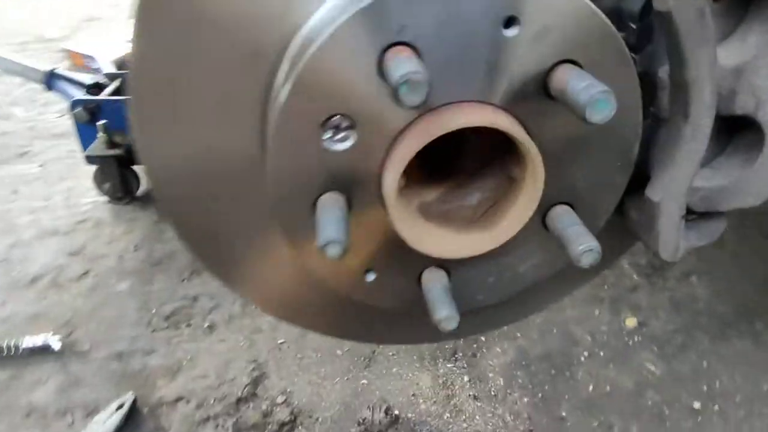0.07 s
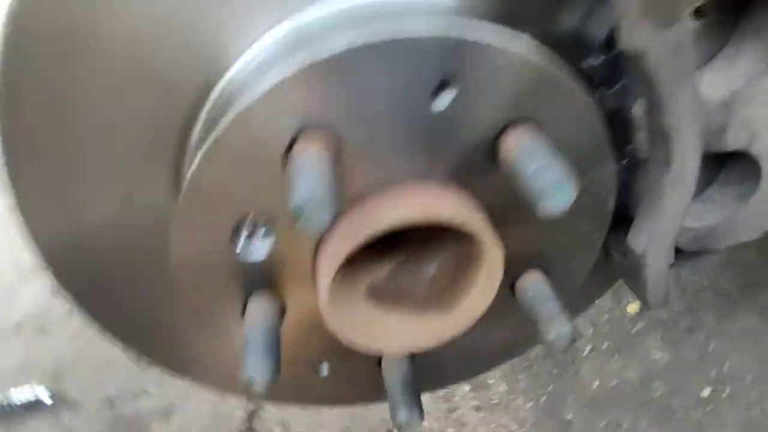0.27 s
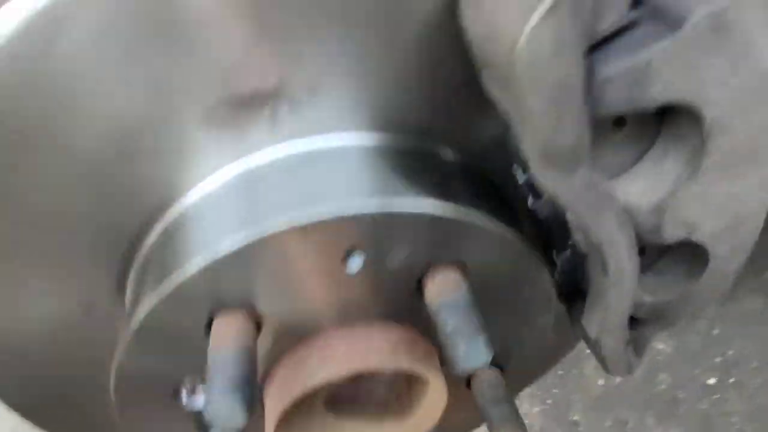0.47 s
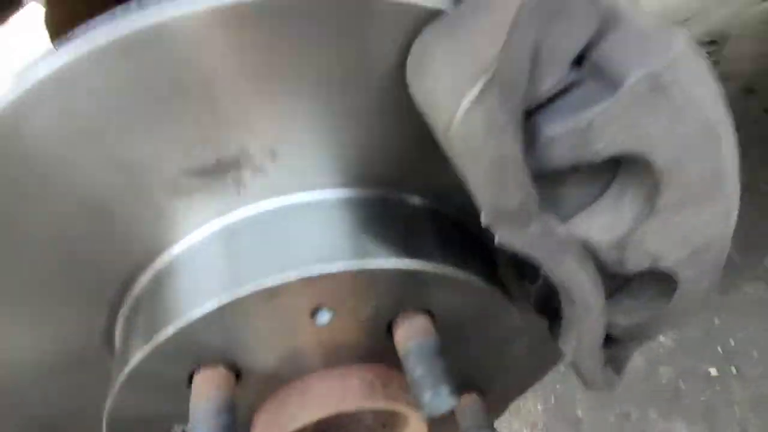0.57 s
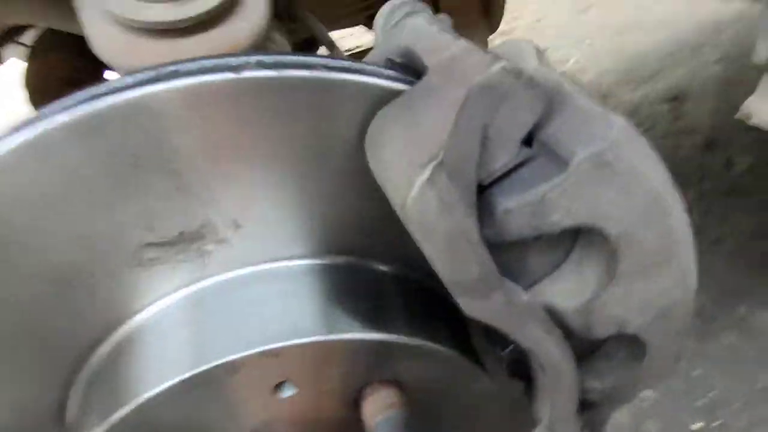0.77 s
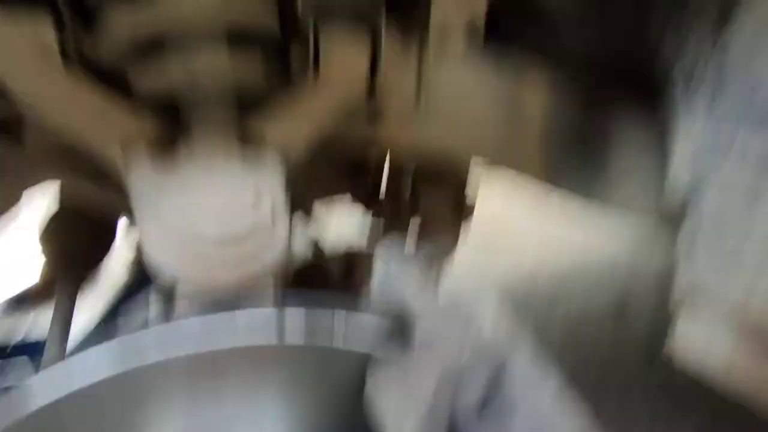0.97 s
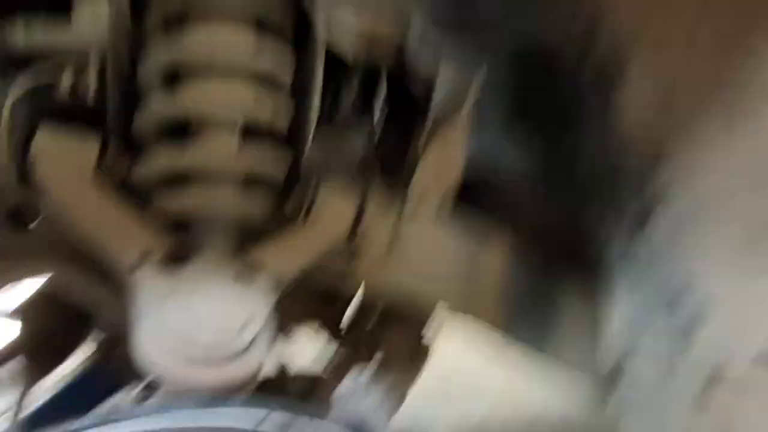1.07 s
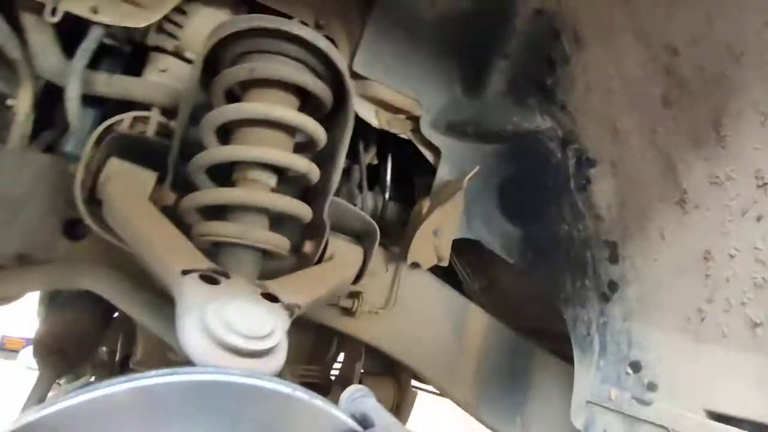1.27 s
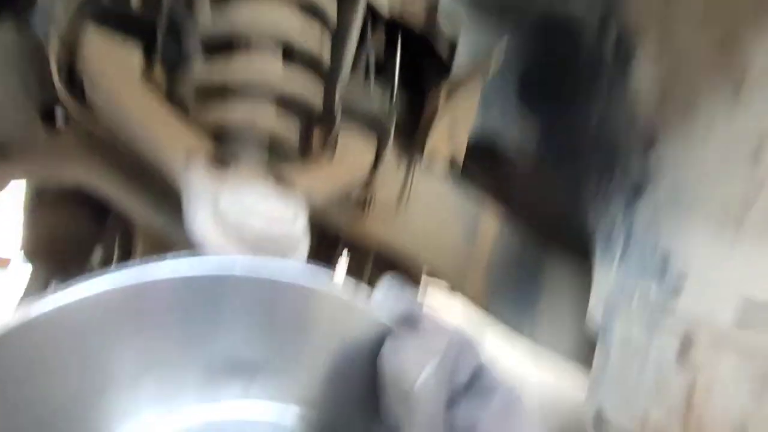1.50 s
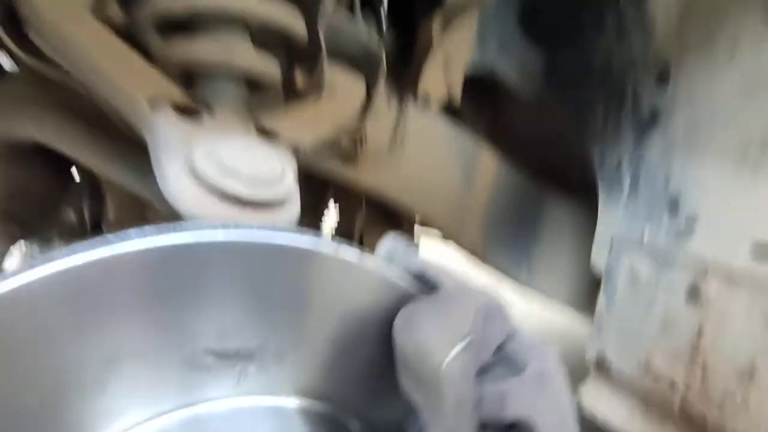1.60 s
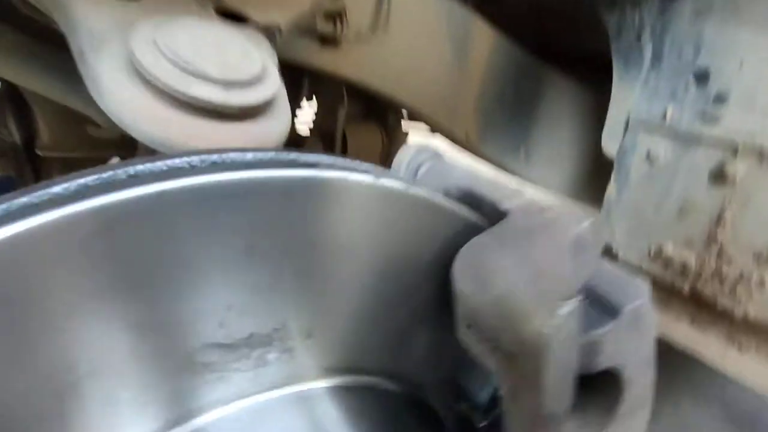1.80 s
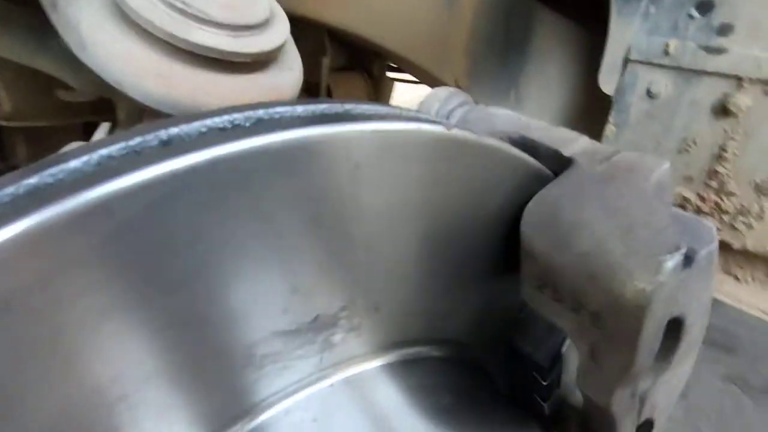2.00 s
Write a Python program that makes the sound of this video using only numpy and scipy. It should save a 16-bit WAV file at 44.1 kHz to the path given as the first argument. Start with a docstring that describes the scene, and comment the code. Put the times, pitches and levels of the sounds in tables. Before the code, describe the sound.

A sharp metallic clank sounds at about 0.2 seconds, just after a light scrape, as a loose steel part strikes a brake disc. A dull knock follows at 0.3 seconds, and the ring fades by about 0.6 with a slight workshop echo. Soft rubbing and moving air continue on the close microphone over a very faint hum, dipping around 1.4 seconds and returning with a faint scrape near 1.8.

```python
"""Soft rubbing, then a sharp clank: a loose steel part at a car's wheel hub shifts, strikes the brake disc
and drops back with a dull knock. Each impact excites damped modes of the hub and longer ones of the disc,
which rings briefly in an open-sided workshop. Rubbing and moving air swell and ebb as a hand-held phone
is swung up over the suspension; a faint hum lies underneath."""
import sys
import numpy as np
from scipy import signal
from scipy.fft import rfft, irfft
from scipy.io import wavfile
from scipy.ndimage import uniform_filter1d

SR = 44100
rng = np.random.default_rng(int(sys.argv[2]) if len(sys.argv) > 2 else 0)


def to_wav(sig):
    """Store sig (one row per channel, or 1-D mono) as 16-bit WAV at the path in sys.argv[1].

    Samples outside -1..1 are clipped; the rate is SR.
    """
    pcm = np.clip(np.atleast_2d(sig), -1, 1) * 32767
    pcm = np.round(pcm).astype(np.int16)
    wavfile.write(sys.argv[1], SR, pcm.T)  # frames by channels


N = 90404

# impacts of the loose part (time [s], thud gain [dB], ring gain [dB], crack gain [dB],
# contact cut-off [Hz], extra gain of the hub's bass modes [dB])
IMPACTS = [(0.17, -17.5, -24, -28, 2500, -2), (0.2068, -20.5, -31, -16, 1510, -20),
           (0.2282, 0, 2, -12, 7150, -4.5), (0.2334, -7, -23, -1.5, 3000, 9.5),
           (0.3189, 2, -46, -16.5, 833, 6.5), (0.324, -14.5, -46, -28, 687, 3.5)]
# modes of the brake disc (frequency [Hz], level [dB], free t60 [s], rise [s], L-R [dB], right lag [rad])
DISC_MODES = [(1258.4, -15.5, 0.31, 0.087, 3.5, 1.24), (2449, -31.5, 0.21, 0.00056, 8, 0.87),
              (2593, -47, 0.42, 0.00059, 6, 3.4), (2774, -50, 0.45, 0.0008, -3, 0.5),
              (3742, -45.5, 0.78, .003, 8.5, 0.3), (5165, -56, 0.23, .001, -11, 1),
              (6628, -45.5, 0.21, 0.00078, -1, 0)]
CONTACT_S = 0.00086  # rise time of a struck mode of the hub or the loose part


def hub_thuds():
    """Modal superposition: each impact excites the heavily damped modes of hub and suspension."""
    # hub modes (frequency [Hz], level [dB], t60 [s], L-R [dB], right lag [rad])
    hub_modes = [(354.7, -31, 0.042, 4, .05), (416.6, -27.5, 0.036, 2.5, 0.2), (545, -18.5, 0.029, -1, 0.4),
                 (630, -19.5, 0.034, -0.5, 0.69), (710, -25.5, 0.017, 19, 0.49),
                 (800.6, -30, 0.081, -1, 1.63), (1363, -29.5, 0.037, -10, 0.29),
                 (1418, -29, 0.029, 19.5, 0.65), (1674, -38.5, .05, -14, 0)]
    out, bass_hz = 0, 480
    for start, thud_db, _, _, contact_hz, bass_db in IMPACTS:
        for hz, db, t60, pan_db, lag in hub_modes:
            gain = undb(thud_db + db + bass_db * (hz < bass_hz)) * contact_lowpass(hz, contact_hz)
            out += gain * mode(clock() - start, hz, t60, CONTACT_S, pan_db, lag)
    return out


def disc_ring():
    """Free vibration of the struck disc, with added damping once the part has dropped back."""
    out, settled_s = 0, 0.34
    damping = fade(np.maximum(clock() - settled_s, 0), t60=0.7)
    for start, _, ring_db, _, contact_hz, _ in IMPACTS:
        for hz, db, t60, rise, pan_db, lag in DISC_MODES:
            gain = undb(ring_db + db) * contact_lowpass(hz, contact_hz)
            out += gain * mode(clock() - start, hz, t60, rise, pan_db, lag)
    return damping * out


def contact_cracks():
    """A brief contact has a broad spectrum: each impact radiates a fast-decaying burst of noise."""
    # crack spectrum (frequency [Hz], relative density [dB])
    spectrum = [(250, -48), (600, 2), (1050, 6), (1400, -11.5), (2500, -5.5), (3300, -13.5), (4000, -8.5),
                (4700, -18.5), (7000, -14), (10500, -25.5), (15000, -17)]
    envelope = sum(undb(db) * fade(clock() - start, t60=0.038) for start, _, _, db, _, _ in IMPACTS)
    return undb(-28) * pan(5) * envelope * noise(spectrum)


def loose_part():
    """The loose part rings at its own natural frequencies as it touches and settles."""
    # rings (time [s], frequency [Hz], level [dB], t60 [s], L-R [dB])
    rings = [(.171, 549, -39, 0.24, -2), (.319, 1994, -51, 0.43, 3)]
    return sum(undb(db) * mode(clock() - start, hz, t60, CONTACT_S, pan_db)
               for start, hz, db, t60, pan_db in rings)


def workshop(direct):
    """Reverberation by convolution: quick reflections in the wheel arch, a longer echo under the roof."""
    # echo spectrum (frequency [Hz], relative density [dB])
    spectrum = [(270, -8), (400, -8.5), (700, -6.5), (1050, -16), (1300, -7), (2500, -11.5), (6000, -5),
                (15000, -4.5)]
    out, delay_s = direct, 0.003
    for db, t60 in ((-13, 0.12), (-9, 0.4)):  # arch, roof
        response = noise(spectrum, coherence=0.86) * fade(clock() - delay_s, t60)
        response /= np.sqrt(np.mean(np.sum(response ** 2, axis=1)))  # unit energy
        out = out + undb(db) * signal.fftconvolve(direct, response, axes=1)[:, :N]
    return out


def rubbing():
    """Friction and moving air make three bands of noise, quietest and dullest while the phone rests."""
    # strength of the rubbing (time [s], low [dB], middle [dB], treble [dB])
    efforts = [(0, -62, -66.5, -74.5), (0.121, -70.5, -68.5, -76), (.22, -57, -57, -66),
               (.42, -49.5, -56.5, -65.5), (.54, -54.5, -61, -65.5), (0.662, -54.5, -57, -64.5),
               (0.821, -61, -64, -74.5), (0.928, -60.5, -68.5, -74.5), (1.1, -63.5, -70.5, -76.5),
               (1.3, -69.5, -74, -80.5), (1.459, -73, -76.5, -84.5), (1.63, -59.5, -70, -75),
               (1.76, -58.5, -62.5, -72.5), (1.9, -57, -60, -67), (2.05, -52.5, -60, -65)]
    # spectra of the three bands (frequency [Hz], relative density [dB])
    low = [(180, -13), (210, 10), (250, -4.5), (295, -4), (350, 1.5), (430, 0.5), (520, -4.5), (700, -6),
           (830, -15), (1000, -6)]
    middle = [(470, -77.5), (800, 5.5), (1030, 3), (1270, 1), (1900, 0), (2200, 1.5), (3230, -5.5),
              (3880, -6), (5000, -19.5), (6500, -69), (11000, -120)]
    treble = [(4300, -29.5), (4800, -16), (5900, -7), (6850, 2), (7900, -5.5), (10000, -15.5), (13000, -15),
              (15000, -10.5), (15800, -8)]
    # each band at the microphone ports (gain [dB], L-R [dB], coherence [0-1], right lag [s])
    bands = [(-1.5, 1, 0.68, 0.00009), (1, 6, 0.1, .0002), (2, 6.5, 0.2, 0.000387)]
    flicker_db, grain_db, brightening = 0.12, 0.86, 0.083
    times, *curves = np.array(efforts).T
    out = 0
    for spectrum, curve, (db, pan_db, coherence, lag) in zip((low, middle, treble), curves, bands):
        band = noise(spectrum, coherence, lag)
        effort_db = np.interp(clock(), times, curve)
        level_db = effort_db + db + flicker_db * wander(hz=26.06)
        if spectrum is not low:
            level_db += grain_db * wander(hz=412)
        if spectrum is treble:  # harder rubbing is brighter
            top = irfft(rfft(band) * top_octave(np.fft.rfftfreq(N, 1 / SR)), N)
            band += top * (undb(brightening * (effort_db - curve.mean())) - 1)
        out += undb(level_db) * pan(pan_db) * band
    return out


def scuffs():
    """Friction hiss: the loose part scrapes just before the clank, then come faint handling brushes."""
    # short swells of hiss (time [s], duration [s], level [dB], L-R [dB])
    swells = [(0.176, 0.028, -48, 5), (0.583, 0.039, -60, -2), (0.851, 0.036, -61.5, 3.5),
              (1.896, 0.012, -59.5, 2)]
    # hiss spectrum (frequency [Hz], relative density [dB])
    spectrum = [(400, -20), (1500, -6.5), (3500, -4.5), (5000, -13.5), (7200, -4), (10000, -17.5),
                (15000, -16)]
    hiss = noise(spectrum)
    return sum(undb(db) * pan(pan_db) * swell(start, length) * hiss
               for start, length, db, pan_db in swells)


def scrapes():
    """Light scrapes and squeaks: friction drives one resonance each, the narrower the more tonal."""
    # strokes (time [s], duration [s], level [dB], centre frequency [Hz], bandwidth [Hz])
    strokes = [(.18, .04, -47, 830, 250), (1.256, .02, -69, 7150, 1400), (1.322, .035, -75, 7150, 1400),
               (1.585, .19, -69, 3660, 130), (1.798, .045, -60, 3950, 550), (1.795, .05, -59, 2250, 900),
               (1.796, .022, -68, 6200, 600), (1.796, .022, -69, 8900, 400), (.63, .15, -74, 5480, 50)]
    out = 0
    for start, length, db, hz, width in strokes:
        band = shaped_noise(lambda f: resonance(f, hz, width), coherence=0.38)
        out += undb(db) * swell(start, length) * band
    return pan(7.6) * out


def disc_drag():
    """Forced vibration: friction keeps the disc's modes singing faintly until the clank."""
    def gain(f):
        # the struck levels, tilted towards the treble, with their contrast in dB halved
        return sum(undb((db + 3.5 * np.log2(hz / DISC_MODES[0][0])) / 2) * resonance(f, hz, width_hz=22)
                   for hz, db, *_ in DISC_MODES)
    envelope = np.interp(clock(), [0, 0.18, 0.24], [0.5, 1.5, 0])
    return undb(-68.5) * pan(5) * envelope * shaped_noise(gain, coherence=0.9)


def hum():
    """A harmonic series, as of a distant engine: orders 8 to 15 of a slow firing rate, each wavering."""
    # course of the hum (time [s], firing rate [Hz], level [dB])
    course = [(0, 37.7, -73), (0.651, 37.57, -64.5), (1.0, 37.38, -69), (1.3, 37.73, -72.5),
              (1.56, 38.09, -70.5), (1.8, 38.4, -62), (2.05, 37.87, -64)]
    times, rate, db = np.array(course).T
    phase = 2 * np.pi * np.cumsum(np.interp(clock(), times, rate)) / SR
    out, tilt_db_per_octave, waver_db = 0, -8.5, 3.5
    for order in range(8, 16):
        gain = undb(tilt_db_per_octave * np.log2(order) + waver_db * wander(hz=5.865))
        out += gain * np.sin(order * phase + rng.uniform(0, 2 * np.pi))
    return undb(np.interp(clock(), times, db)) * pan(2.5) * out / out.std()


def mode(t, hz, t60, rise, pan_db, lag=0):
    """A damped oscillator that builds up and dies away, with its own level and phase at each port."""
    envelope = fade(t, t60) * (1 - np.exp(-np.maximum(t, 0) / rise))
    return pan(pan_db) * envelope * np.sin(2 * np.pi * hz * t - np.array([[0], [lag]]))


def contact_lowpass(hz, cutoff_hz):
    """A softer contact lasts longer and so excites high modes less."""
    return 1 / np.sqrt(1 + (hz / cutoff_hz) ** 4)


def resonance(hz, centre_hz, width_hz):
    """Lorentzian peak; the width is taken at half height."""
    return 1 / (1 + ((hz - centre_hz) / (width_hz / 2)) ** 2)


def shaped_noise(gain, coherence=0, lag=0):
    """Filtered stereo noise of rms 1; the ports share a coherent part, the right one later."""
    hz = np.fft.rfftfreq(N, 1 / SR)
    left, independent = rfft(rng.standard_normal((2, N)))
    right = coherence * left * np.exp(-2j * np.pi * hz * lag) + np.sqrt(1 - coherence ** 2) * independent
    x = irfft(np.array([left, right]) * gain(hz), N)
    return x / x.std()


def noise(spectrum, coherence=0, lag=0):
    """Noise coloured by (frequency [Hz], level [dB]) points, falling steeply outside them."""
    f, db = np.array(spectrum, float).T
    def gain(hz):
        skirts = np.minimum((hz + 1) / f[0], 1) ** 10 * np.minimum(f[-1] / (hz + 1), 1) ** 10
        return undb(np.interp(np.log(hz + 1), np.log(f), db)) * skirts
    return shaped_noise(gain, coherence, lag)


def wander(hz):
    """Smooth random modulation of standard deviation 1."""
    step = int(SR / hz)
    x = uniform_filter1d(np.repeat(rng.standard_normal(N // step + 1), step), step)[:N]
    return x / x.std()


def swell(start, length):
    """A single arch that peaks a little after its middle."""
    return np.sin(np.pi * np.clip((clock() - start) / length, 0, 1) ** 1.37)


def fade(t, t60):
    """Silence before t = 0, then exponential decay by 60 dB in t60 seconds."""
    return (t >= 0) * np.exp(-np.log(1000) * np.maximum(t, 0) / t60)


def top_octave(hz):
    """Smooth step from 0 to 1 into the top octave."""
    return 1 / (1 + (9700 / (hz + 1)) ** 10)


def pan(db):
    """Left and right gains for a level difference L-R."""
    return undb(np.array([[db], [-db]]) / 2)


def undb(db):
    return 10 ** (np.asarray(db) / 20)


def clock():
    return np.arange(N) / SR


def scene():
    """Superposition: the clank and its echo over friction noise and a faint hum."""
    clank = hub_thuds() + disc_ring() + contact_cracks() + loose_part()
    return workshop(clank) + disc_drag() + scuffs() + scrapes() + rubbing() + hum()


def record(dry):
    """The phone's frequency response: a wind filter cuts the bass, the middle dips, the top ends steeply."""
    wind_hz, leak_hz, hollow_hz, hollow_width_hz, top_hz = 274, 153, 993, 170, 15740
    hz = np.fft.rfftfreq(2 * N, 1 / SR) + 1
    highpass = 1 / (1 + (wind_hz / hz) ** 20)
    bass_leak = undb(-15.5) * (hz / leak_hz) ** 0.5 / (1 + (hz / leak_hz) ** 10)
    hollow = undb(-5.5 * np.exp(-((hz - hollow_hz) / (hollow_width_hz / 2)) ** 2))
    ports = pan(-9) ** top_octave(hz)  # the right port is brighter
    coloured = irfft(rfft(dry, 2 * N) * ports * hollow * (highpass + bass_leak))[:, :N]
    lowpass = signal.ellip(10, 0.2, 70, top_hz, fs=SR, output="sos")
    return signal.sosfilt(lowpass, coloured)


dry = scene()
out = record(dry)
to_wav(out)
```